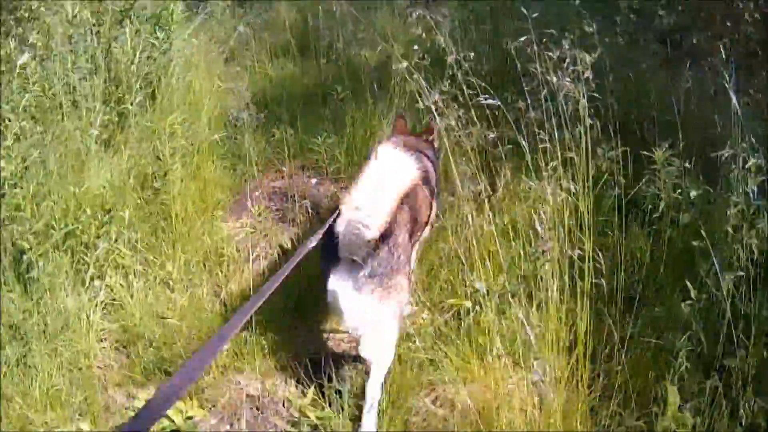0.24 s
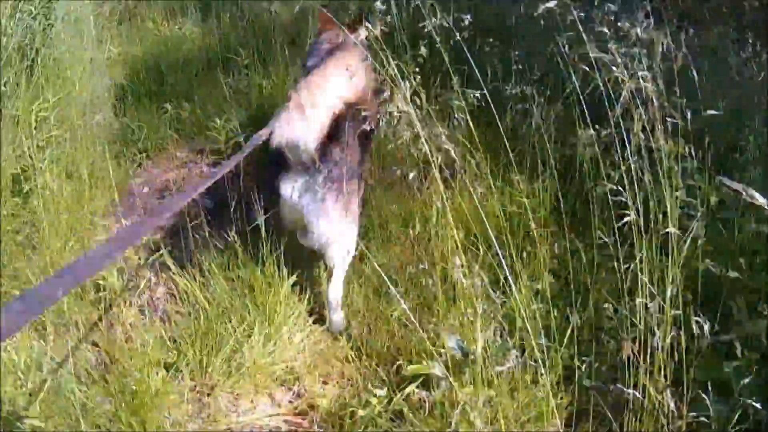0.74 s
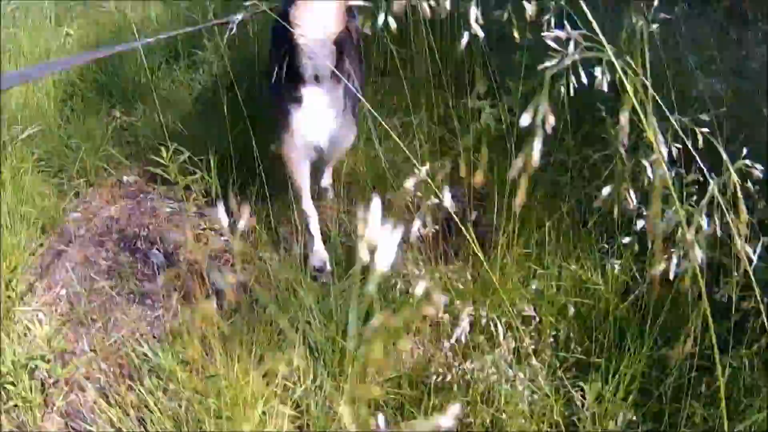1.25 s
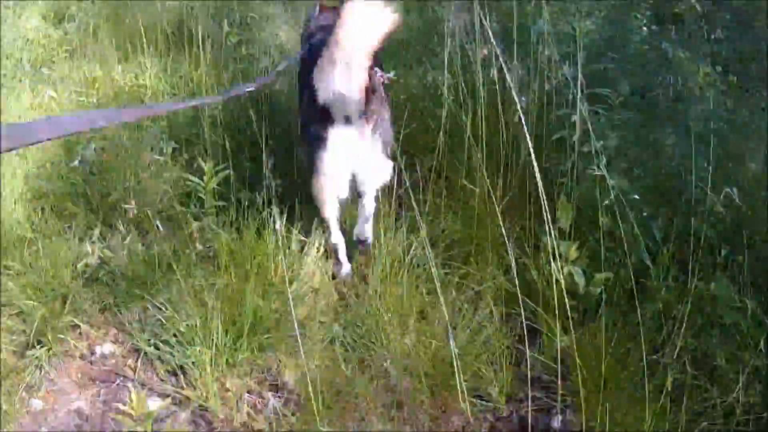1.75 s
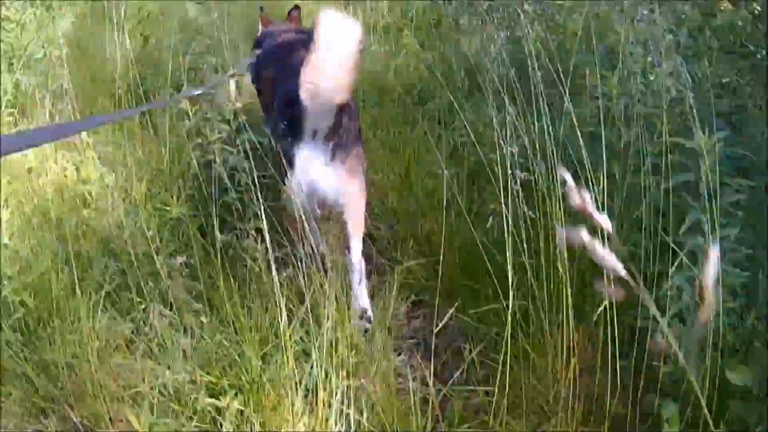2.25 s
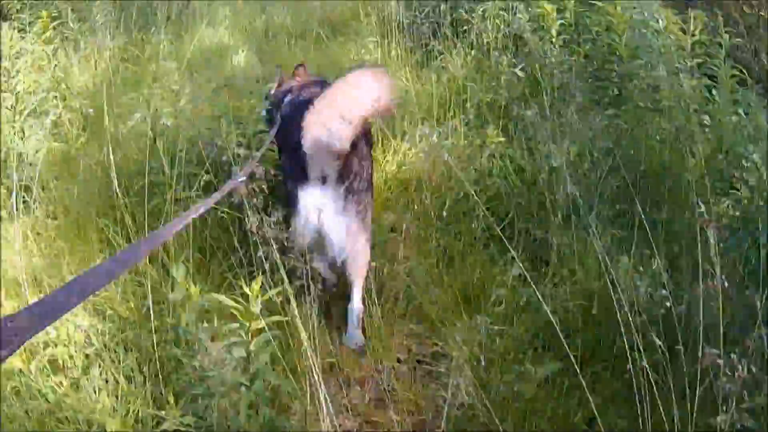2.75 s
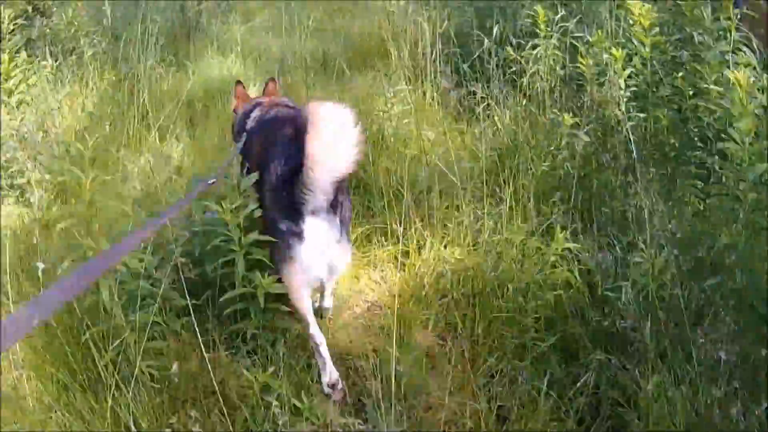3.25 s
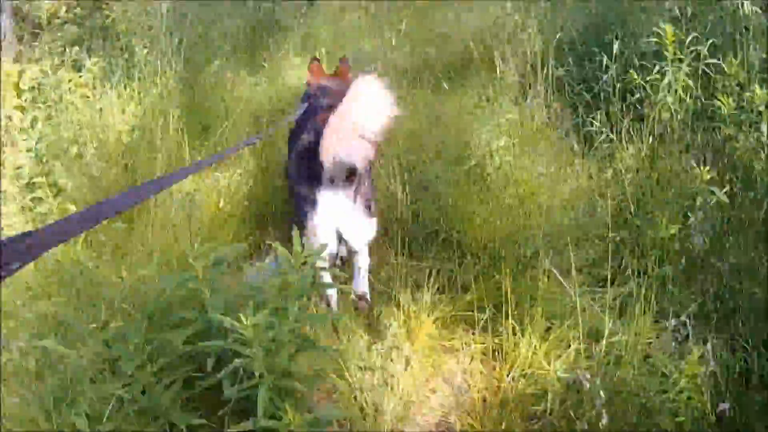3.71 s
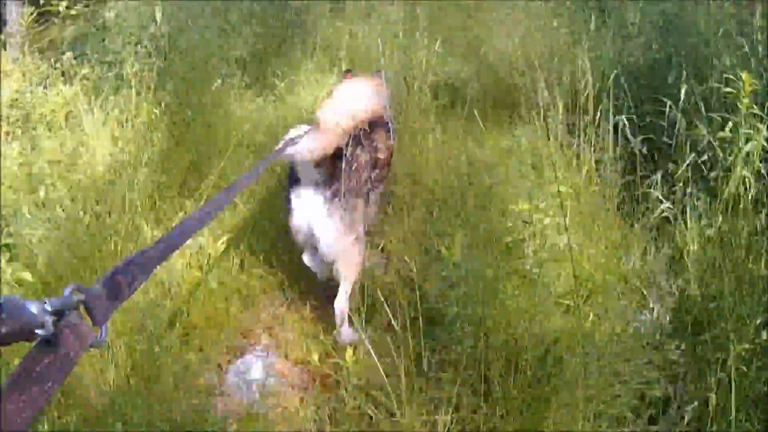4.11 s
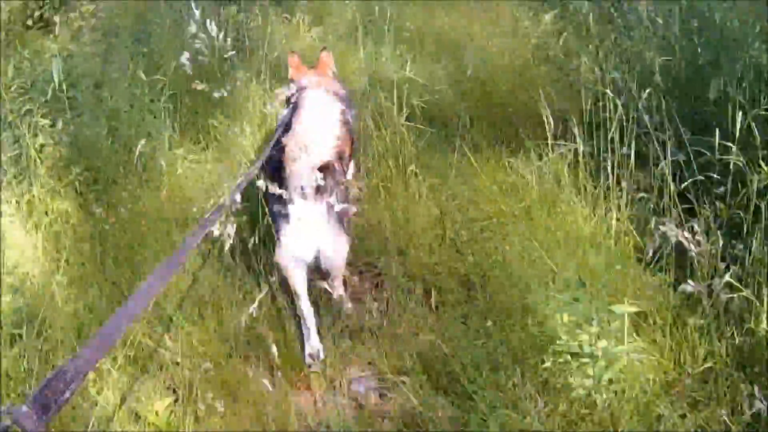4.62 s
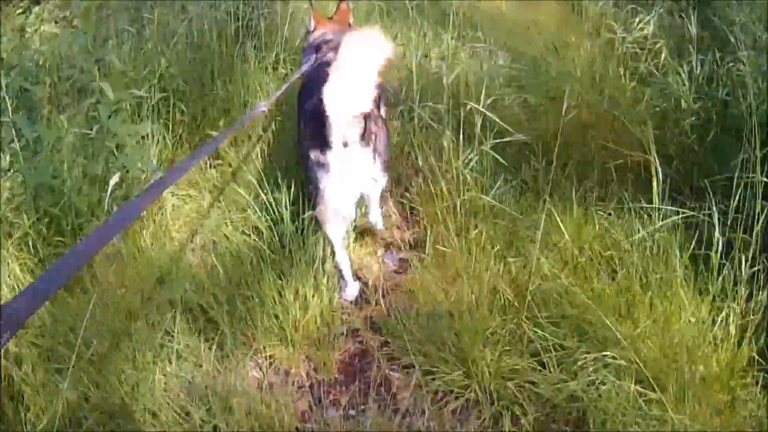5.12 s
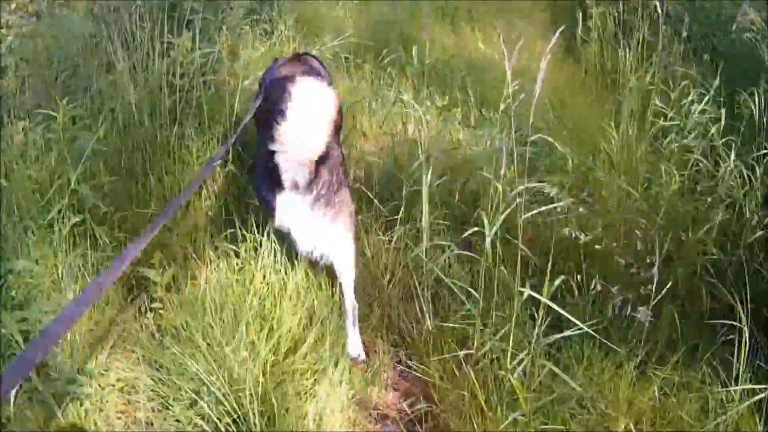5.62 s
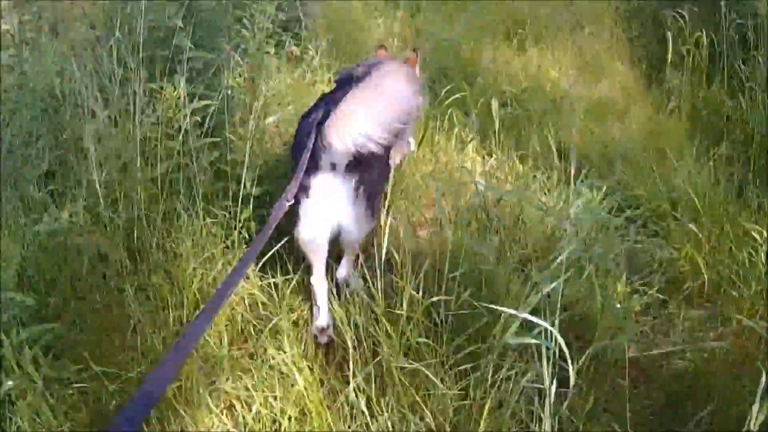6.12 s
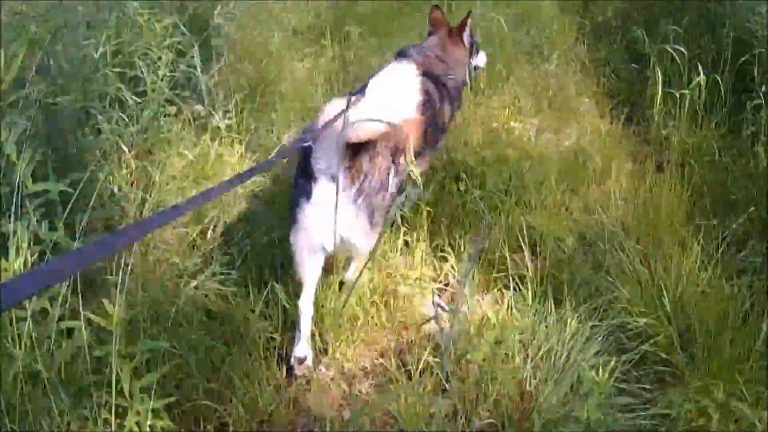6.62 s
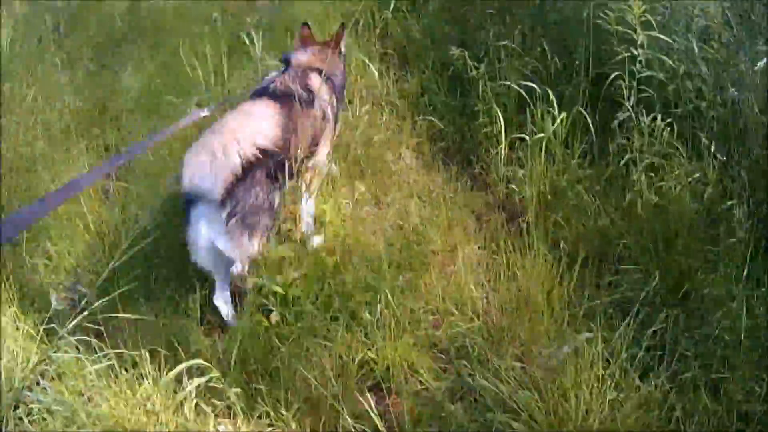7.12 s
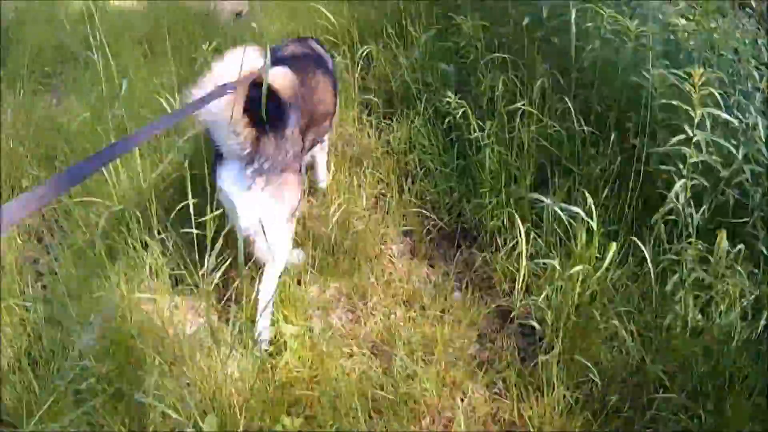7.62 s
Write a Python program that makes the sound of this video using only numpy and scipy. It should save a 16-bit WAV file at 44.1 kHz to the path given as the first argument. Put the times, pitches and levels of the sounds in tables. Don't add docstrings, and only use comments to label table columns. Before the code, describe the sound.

Close, muffled rustling starts at once and continues to the end, surging and easing irregularly as legs push through tall weeds. Brittle stalks crackle and pop on the plastic housing, sometimes in quick pairs. Seed heads add faint dry fizz; breeze and footfalls rumble weakly. A quiet, steady, very high whine and hiss remain underneath.

```python
import sys
import numpy as np
from scipy import signal
from scipy.fft import rfft, irfft
from scipy.io import wavfile
from scipy.ndimage import map_coordinates

SR = 44100
rng = np.random.default_rng(int(sys.argv[2]) if len(sys.argv) > 2 else 0)


def to_wav(sig):
    pcm = np.clip(np.atleast_2d(sig), -1, 1) * 32767
    pcm = np.round(pcm).astype(np.int16)
    wavfile.write(sys.argv[1], SR, pcm.T)


def undo_db(level):
    steps = np.asarray(level, float) / 20
    return 10 ** steps


N = 346626

# f/Hz, level/dB per Hz
HISS_COLOUR = [(4000, -28), (4900, -0.5), (7400, -2.5), (8200, 0), (10500, 2.5), (12500, 0.5), (15700, 0),
               (16500, 1)]
# f/Hz, level/dB per Hz
SHELL_COLOUR = [(60, -61), (100, -43), (246, -26.5), (500, -13), (830, -2.5), (1060, -1), (1370, -4),
                (2000, -23), (3050, -47), (3650, -55), (4500, -62.5), (5000, -73.5), (6500, -100)]
# crest t/s, rustle level/dB, swell time/s, fade time/s (each over SWEEP_DB)
SWEEPS = [(.09, -44, 0.52, 0.18), (.31, -46.5, 0.081, 0.12), (.89, -40, 0.27, 0.065),
          (1.01, -41.5, 0.038, 0.044), (1.24, -46, 0.1, 0.031), (1.43, -46, 0.12, 0.041),
          (1.54, -48, 0.041, 0.12), (1.66, -45, .15, 0.048), (1.85, -50.5, 0.25, 0.1),
          (2.04, -40, 0.065, 0.043), (2.23, -45.5, 0.12, 0.08), (2.68, -42, 0.15, 0.19),
          (2.86, -43, 0.047, 0.093), (3.26, -47.5, 0.25, 0.11), (3.555, -44, 0.14, 0.05),
          (3.85, -46.5, 0.33, .15), (4.05, -48, 0.2, 0.4), (4.41, -45, 0.19, 0.1), (4.56, -41, 0.087, 0.26),
          (5.07, -48.5, 0.089, 0.18), (5.33, -42.5, 0.08, 0.11), (5.7, -46, 0.078, 0.2),
          (5.97, -42, 0.037, 0.069), (6.1, -51, 0.073, 0.13), (6.46, -45, 0.2, .25),
          (6.92, -45.5, .04, 0.21), (7.07, -44.5, 0.16, 0.087), (7.23, -46, 0.12, 0.051),
          (7.65, -46.5, 0.19, 0.15), (7.855, -43.5, 0.04, .1)]
# crest t/s, fizz level/dB, swell time/s, fade time/s, top edge level/dB above the fizz
WHISKS = [(.1, -93.5, .2, 0.33, -1), (.55, -87, 0.32, 0.23, -14.5), (.83, -88, 0.19, 0.11, -5.5),
          (1.6, -91.5, 0.16, .1, -5.5), (1.84, -86, 0.17, .05, -14), (2.05, -90.5, 0.088, .05, -5),
          (2.29, -91.5, .2, .04, -9), (2.69, -90, 0.17, .12, -7), (2.96, -93, 0.24, 0.032, 1),
          (3.27, -87.5, 0.22, 0.089, -17), (3.515, -82, .03, .04, -16.5), (3.568, -75.5, .05, 0.012, -20),
          (4.1, -92, .2, 0.13, -5), (4.62, -90.5, 0.43, 0.34, -12), (5.32, -90, 0.041, 0.066, -12),
          (5.51, -89, 0.025, .08, -14.5), (5.69, -95, 0.054, 0.13, -9), (6.42, -91, 0.17, 0.38, -6),
          (6.93, -89.5, .04, .1, -7), (7.03, -90, .12, 0.19, 0.5), (7.53, -92.5, .06, 0.45, -4)]
# f/Hz, level/dB per Hz
FIZZ_COLOUR = [(2400, -26.5), (3000, -6.5), (3650, 0), (4050, -8), (4600, -4.5), (4950, -40), (7400, -40.5),
               (8300, -15), (9300, -17), (12000, -28)]
# f/Hz, level/dB per Hz
TICK_COLOUR = [(1500, -25.5), (2100, 4), (3000, -9), (3700, -10), (4200, -22.5), (4900, -43)]
# crest t/s, peak level/dB, ring f/Hz, tick level/dB above the peak
BRITTLE_STEMS = [(.0004, -31, 1190, -40), (.7374, -41, 1180, -27), (1.0064, -28.5, 1100, -43),
                 (1.0938, -26.5, 1240, -34), (1.216, -30, 1090, -48), (1.625, -32, 1010, -34),
                 (1.8322, -33, 1250, -34), (1.9545, -32.5, 1210, -43), (2.0404, -23.5, 1090, -45),
                 (2.0643, -31, 1130, -45), (2.2959, -28.5, 1050, -36.5), (2.9694, -29, 1110, -41),
                 (3.0992, -32, 1100, -41), (3.2564, -31.5, 1190, -36), (3.2715, -27.5, 890, -42),
                 (3.5212, -33, 1160, -28), (3.8672, -30, 1170, -44), (4.4007, -31.5, 1170, -37.5),
                 (4.635, -32, 990, -45), (4.6978, -35.5, 1050, -37), (4.7325, -33, 950, -41),
                 (4.9137, -32.5, 1110, -31), (5.311, -29, 1090, -42), (5.3175, -27, 966, -39),
                 (5.3689, -30, 1010, -40), (5.549, -33.5, 1190, -39), (6.503, -34.5, 940, -35),
                 (6.5495, -27.5, 1150, -36), (6.904, -27, 1180, -35), (7.0936, -32, 1220, -43)]
# crest t/s, peak level/dB, ring f/Hz
THIN_BLADES = [(.0588, -38, 1000), (.314, -35.5, 1230), (.4231, -36, 840), (.6958, -41, 1150),
               (1.2275, -30, 1130), (1.4422, -32, 1030), (1.541, -34.5, 1170), (1.7163, -34.5, 950),
               (1.9334, -33.5, 980), (2.18, -34, 1140), (2.251, -30.5, 1150), (2.7025, -30, 1170),
               (2.796, -34, 1050), (2.8513, -30, 950), (2.9524, -33, 1070), (3.4093, -35.5, 1150),
               (3.831, -34, 990), (3.9354, -34.5, 1080), (4.3502, -32, 940), (4.4462, -31.5, 1140),
               (4.8095, -35.5, 710), (5.0499, -35.5, 1020), (5.4127, -35.5, 1040), (5.7302, -32.5, 1230),
               (5.803, -34, 1130), (5.9773, -30, 1050), (6.055, -32, 915), (6.1285, -35.5, 950),
               (7.449, -36, 980), (7.583, -32, 1050)]
# crest t/s, peak level/dB, ring
# f/Hz
HUSKS = [(0.079, -44, 1100), (0.7196, -41, 1200), (0.7633, -35.5, 1250), (0.8968, -37, 1250),
         (1.6688, -35.5, 1100), (3.173, -38, 1300), (3.4326, -39, 1100), (3.5114, -35, 1150),
         (3.555, -38.5, 1030), (4.4418, -36, 1100), (4.6533, -41, 1100), (5.1424, -37.5, 990),
         (5.5179, -40.5, 1200), (5.559, -33.5, 1100), (5.5795, -36.5, 1060), (6.9446, -35, 930),
         (7.2366, -37, 950), (7.8464, -36, 1040)]
# crest t/s, peak level/dB, ring f/Hz
THICK_STEMS = [(0.45, -28.5, 960), (.8697, -22, 1200), (0.8759, -27, 1070), (0.882, -35, 1120),
               (1.2333, -27.5, 1060), (1.255, -27, 1080), (1.612, -26, 1020), (1.634, -25, 910),
               (2.0148, -27, 1170), (2.0217, -29, 1050), (2.0738, -29.5, 1040), (2.2244, -29, 1080),
               (2.8962, -27, 975), (3.2455, -29.5, 1160), (3.4754, -23.5, 1000), (3.5759, -26, 860),
               (4.0257, -27.5, 1080), (4.0305, -23, 1025), (4.1195, -30, 1060), (4.517, -26.5, 1030),
               (4.5215, -31, 1100), (4.6136, -23.5, 1010), (5.3485, -26, 1000), (5.8855, -25, 892),
               (6.4812, -28.5, 1090), (6.4979, -28, 1180), (7.087, -28, 1190), (7.219, -28, 960),
               (7.637, -26.5, 1045), (7.7213, -29, 960)]
# t/s, level/dB
BREEZE = [(0.01, -91.5), (1.08, -86), (1.3, -90), (2.17, -94), (4.18, -93), (5.1, -94), (5.38, -88),
          (6.6, -90), (6.82, -86), (7.37, -92), (7.7, -78.5), (7.85, -94)]
# f/Hz, level/dB per Hz
AIR_COLOUR = [(8.8, -55), (15, -19.5), (65, -4.5), (200, -0.5), (260, -30), (440, -120)]
# t/s, peak level/dB, f/Hz
THUDS = [(.352, -71, 90), (.869, -56, 173), (.97, -73.5, 62), (1.14, -76, 45), (1.262, -68, 65),
         (2.005, -79, 45), (2.314, -61, 290), (2.573, -66, 121), (2.942, -61, 260), (5.879, -70, 223),
         (7.54, -65, 65), (7.595, -72, 60), (7.709, -69, 109)]
# t/s, peak level/dB, f/Hz
BUMPS = [(1.087, -50, 330), (1.537, -52, 330), (1.686, -56, 280), (1.715, -58.5, 250), (2.312, -51.5, 398),
         (3.569, -57, 330), (4.802, -57, 400), (5.403, -48, 370), (6.047, -51, 400), (6.471, -51, 400),
         (7.281, -52.5, 380)]

SWEEP_DB = 10
LULL_DB, USUAL_DB = -56.5, -48.5


def evened(x):
    return x / np.sqrt(np.mean(x ** 2) + 1e-20)


def read(points, hz):
    f, value = np.transpose(points)
    return np.interp(np.log(hz + 1), np.log(f + 1), value)


def slow(rate_hz):
    knots = rng.standard_normal(4000)
    return evened(map_coordinates(knots, [np.arange(N) / SR * rate_hz], order=3))


def coloured(points):
    gain = undo_db(read(points, np.fft.rfftfreq(N, 1 / SR)))
    return evened(irfft(rfft(rng.standard_normal(N)) * gain, N))


def causal(points, size=2048):
    level_db = read(points, abs(np.fft.fftfreq(size, 1 / SR)))
    log_gain = np.log(undo_db(np.maximum(level_db, -100)))
    return np.fft.ifft(np.exp(np.conj(signal.hilbert(log_gain)))).real[:size // 2]


def thirds(x):
    hz, z = np.fft.rfftfreq(len(x), 1 / SR), rfft(x)
    low = 1 / (1 + (hz / 550) ** 8)
    high = 1 - 1 / (1 + (hz / 2100) ** 12)
    return [irfft(z * gain, len(x)) for gain in (low, 1 - low - high, high)]


def swells(rows, rest_db):
    t = np.arange(0, N + 64, 64) / SR
    power = undo_db(2 * rest_db)
    for s, db, swell, fade, *_ in rows:
        away = np.where(t < s, (s - t) / swell, (t - s) / fade)
        power = power + undo_db(2 * (db - SWEEP_DB * away))
    return np.interp(np.arange(N) / SR, t, 10 * np.log10(power))


def follows(db, share):
    return db + share * (swells(SWEEPS, LULL_DB) - USUAL_DB)


def hiss():
    return undo_db(-93.5) * coloured(HISS_COLOUR)


def whine():
    t = np.arange(N) / SR
    blocks = np.floor((t - .0102) * 89.335)
    turns = 10540.0 * t - .478 * blocks + 0.23 * slow(1.2)
    return undo_db(-85.5) * np.sqrt(2) * np.sin(2 * np.pi * turns)


def crackle(per_s, spread_db, clump_db, sharp, count=16):
    chance = per_s / SR * undo_db(clump_db * slow(45))
    size = undo_db(spread_db * np.minimum(rng.exponential(1, N), 3))
    size = size * (rng.random(N) < chance) * rng.choice([-1., 1.], N)
    blade = rng.integers(0, count, N)
    hz = np.fft.rfftfreq(N, 1 / SR) + 1
    out, total = 0, 0
    for kind, f in enumerate(np.geomspace(400, 2400, count)):
        ring = 0.34 + 1 / (1 + 1j * sharp * (hz / f - f / hz))
        out = out + ring * rfft(size * (blade == kind))
        total = total + abs(ring) ** 2
    return evened(irfft(out / np.sqrt(total), N))


def rustle():
    swish = rng.standard_normal(N) * undo_db(1.8 * slow(70))
    rub = crackle(per_s=1500, spread_db=4, clump_db=2, sharp=3) + undo_db(-6.5) * evened(swish)
    low, middle, high = thirds(irfft(rfft(rub) * rfft(causal(SHELL_COLOUR), N), N))
    cloth_low, _, cloth_high = thirds(coloured(SHELL_COLOUR))
    low = evened(low) + undo_db(2) * evened(cloth_low)
    high = evened(high) + undo_db(-4.5) * evened(cloth_high)
    body = undo_db(follows(-63, .45) + 2.3 * slow(12))
    swept_edge = undo_db(follows(-81.5, 0.98) + 1.5 * slow(14))
    whisked_edge = undo_db(swells(WHISKS, -110) + 9)
    edge = np.hypot(swept_edge, whisked_edge)
    return undo_db(swells(SWEEPS, LULL_DB)) * evened(middle) + body * evened(low) + edge * evened(high)


def fizz():
    swept = undo_db(follows(-93.0, .45))
    hz = np.fft.rfftfreq(N, 1 / SR)
    z = rfft(coloured(FIZZ_COLOUR) * undo_db(2.2 * slow(90)))
    body = evened(irfft(z * (hz < 4100), N))
    edge = evened(irfft(z * (hz >= 4100), N))
    tips = [(s, db + top_db, swell, fade) for s, db, swell, fade, top_db in WHISKS]
    body_gain = np.hypot(swept, undo_db(swells(WHISKS, -110)))
    edge_gain = np.hypot(swept * undo_db(-9), undo_db(swells(tips, -115)))
    return body_gain * body + edge_gain * edge


def stray_flicks(count=40):
    when, size, pitch, dry = rng.random((count, 4)).T
    at = (when * (N - 1)).astype(int)
    level_db = follows(USUAL_DB + 5, 0.85)[at] - 4.5 * size
    return np.transpose([when * N / SR, level_db, 1060 * (.85 + .3 * pitch), -44 - 20 * dry])


def stems():
    green = [(*row, -56) for row in [*THIN_BLADES, *THICK_STEMS]]
    husks = [(*row, -33) for row in HUSKS]
    return [*BRITTLE_STEMS, *green, *stray_flicks(), *husks]


def snaps():
    size, crest = 1024, 200
    out = np.zeros(N + SR)
    t = (np.arange(size) - crest) / SR
    tick = np.roll(causal(TICK_COLOUR), 150)
    tick = tick / abs(tick).max()
    rows = stems()
    for (s, db, hz, tick_db), (sign, lag, back, long) in zip(rows, rng.random((len(rows), 4))):
        swing = t * hz
        shape = np.exp(-(swing / np.where(swing < 0, .75, 0.95 + 0.15 * long)) ** 2)
        ring = shape * np.cos(2 * np.pi * swing)
        ring = ring - shape * ring.sum() / shape.sum()
        snap = ring + undo_db(tick_db + 6.0) * tick
        rebound = np.roll(snap, int(SR * (.0016 + .0016 * lag)))
        snap = snap + undo_db(-5 - 9 * back) * rebound
        at = size - crest + round(s * SR)
        out[at:at + size] += undo_db(db) * np.sign(sign - .5) * snap
    return out[size:size + N]


def breeze():
    s, level_db = np.transpose(BREEZE)
    level_db = np.interp(np.arange(N) / SR, s, level_db)
    return undo_db(level_db + 3.5) * evened(coloured(AIR_COLOUR) * undo_db(1.4 * slow(24)))


def pushes(rows, cycles):
    out, t = np.zeros(N), np.arange(N) / SR
    for s, db, hz in rows:
        swing = (t - s - .008) * hz
        out += undo_db(db) * np.exp(-(swing / cycles) ** 2) * np.sin(2 * np.pi * swing)
    return out


def thuds():
    return pushes(THUDS, cycles=.6)


def bumps():
    return pushes(BUMPS, cycles=1.05)


def scene():
    return (rustle() + fizz() + snaps() + breeze() + thuds() + bumps())[None]


def roll_off(x):
    return signal.sosfilt(signal.butter(12, 15740, fs=SR, output="sos"), x)


def record(dry):
    return roll_off(dry + hiss() + whine())


dry = scene()
out = record(dry)
to_wav(out)
```